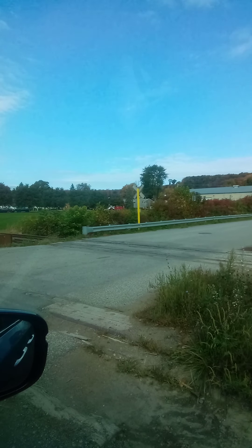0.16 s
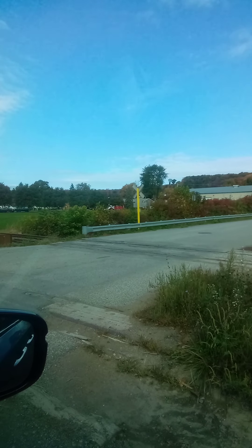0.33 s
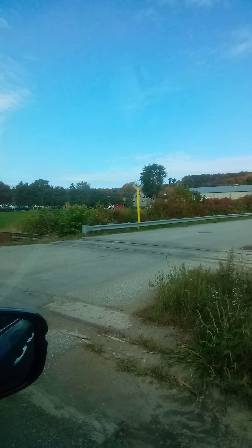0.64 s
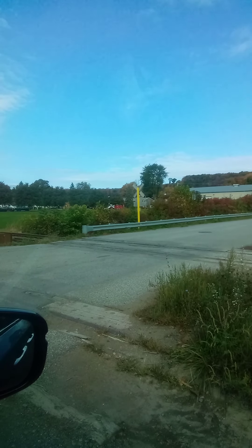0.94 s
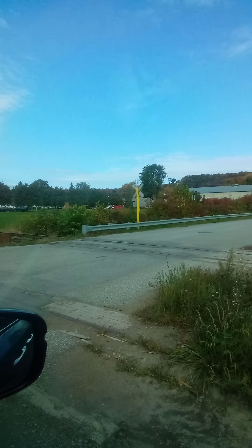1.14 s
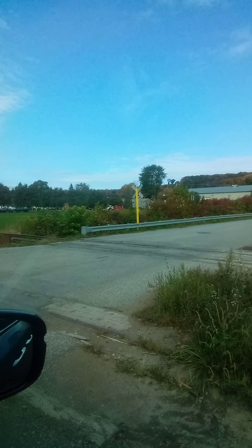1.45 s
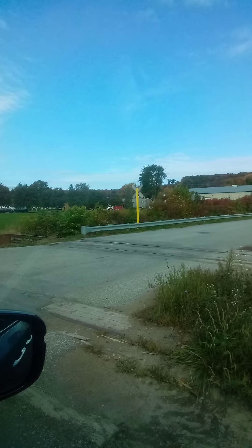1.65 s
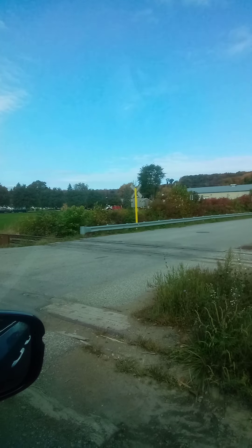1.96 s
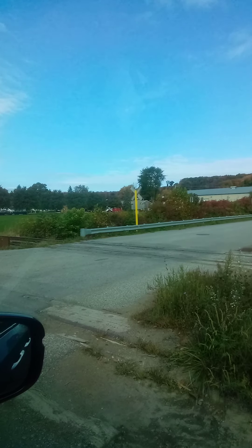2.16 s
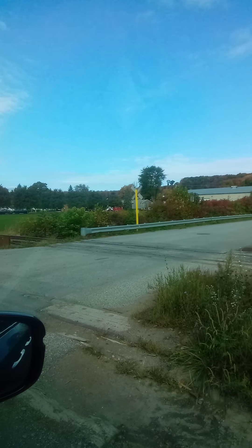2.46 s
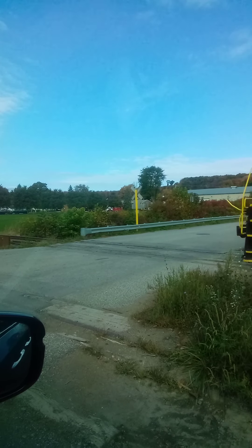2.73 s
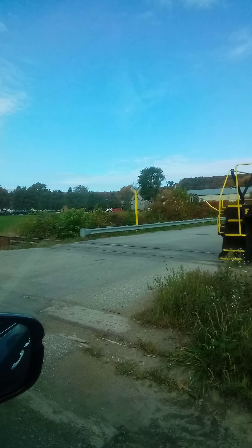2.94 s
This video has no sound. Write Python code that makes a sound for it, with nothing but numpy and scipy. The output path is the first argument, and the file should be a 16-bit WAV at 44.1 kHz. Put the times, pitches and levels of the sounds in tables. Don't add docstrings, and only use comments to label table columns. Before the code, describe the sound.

Locomotive horn blasts one long two-note chord over a low diesel rumble at a country crossing

```python
import sys
import numpy as np
from scipy import signal
from scipy.io import wavfile
from scipy.ndimage import uniform_filter1d

SR = 44100
rng = np.random.default_rng(int(sys.argv[2]) if len(sys.argv) > 2 else 0)


def makeup_ratio(level_db):
    decades = np.asarray(level_db, float) / 20
    return 10 ** decades


def store_pcm(level_fs):
    pcm = np.round(np.clip(level_fs, -1, 1) * 32767).astype(np.int16)
    wavfile.write(sys.argv[1], SR, np.atleast_2d(pcm).T)


N = 136710

START_S, STOP_S = .1965, 2.76
# t/s, level/dB
GLINT = [(.3, -3.5), (.6, -2), (.86, 1.5), (.91, 1.5), (1.25, 2), (1.55, -0.5), (1.75, 0.5), (2.1, -5),
         (2.6, -6.5)]
# t/s, pitch level/dB, brightness/(dB/octave)
HIGH_CHIME = [(.2, -76, 13), (.232, -35, 4), (.25, -22, -1.6), (.5, -22, 1.12), (.8, -20.5, -0.1),
              (1.45, -20, 0.46), (2.0, -17.5, -0.88), (2.58, -17.5, -1.52), (2.75, -21.5, -2.5)]


def curve(table, col=1):
    table = np.array(table, float)
    return np.interp(np.arange(N) / SR, table[:, 0], table[:, col])


def unit(x):
    return x / np.sqrt(np.mean(x ** 2))


def band(x, hz, width_hz):
    return signal.lfilter(*signal.iirpeak(hz, hz / width_hz, fs=SR), x)


def ringing_noise(hz, width_hz):
    return unit(band(band(rng.standard_normal(N), hz, width_hz), hz, width_hz))


def walk(rate_hz):
    hold = int(SR / rate_hz)
    steps = np.repeat(rng.standard_normal(N // hold + 1), hold)
    return 1.9 * uniform_filter1d(uniform_filter1d(steps, hold), hold)[:N]


def bands(table, flicker_db):
    table, out = np.array(table, float), 0
    octaves = np.log2(table[-1, 0] / table[0, 0])
    for hz in table[0, 0] * 2 ** np.arange(0, octaves, 1 / 3):
        db = np.interp(np.log(hz), np.log(table[:, 0]), table[:, 1]) + flicker_db * walk(9)
        noise = rng.standard_normal(N)
        out = out + makeup_ratio(db) * band(band(noise, hz, hz / 3), hz, hz / 3)
    return unit(out)


def blowing():
    t = np.arange(N) / SR
    tail_t60_s = 0.22
    opening = np.clip((t - START_S) / 0.0088, 0, 1)
    return opening * makeup_ratio(-60 * np.clip(t - STOP_S, 0, None) / tail_t60_s)


def ticks():
    # t/s, peak/dB
    blips = [(0.2827, -50), (0.304, -53), (0.6637, -50.5), (1.2053, -60), (1.224, -70), (1.403, -56.5),
             (1.6253, -61.5), (1.764, -58), (1.8221, -51), (2.1816, -53), (2.244, -51.5), (2.2765, -70.5),
             (2.3135, -51.5), (2.3819, -52), (2.4638, -55.5), (2.5045, -63.5)]
    hiss_db, tick_db, t60_s = -84, 2, .002
    out, u = makeup_ratio(hiss_db) * rng.standard_normal(N), np.arange(200) / SR
    for s, db in blips:
        i = int(s * SR)
        out[i:i + 200] += rng.standard_normal(200) * makeup_ratio(db + tick_db - 60 * u / t60_s)
    return signal.sosfilt(signal.butter(4, 8000, "high", fs=SR, output="sos"), out)


def clicks():
    # t/s, peak/dB, f/Hz, t60/s
    knocks = [(.107, -36, 3470, 0.0069), (0.107, -36, 3110, 0.025), (0.1078, -33, 3620, 0.04),
              (0.1078, -35, 1800, 0.016), (0.1075, -35, 2470, 0.021), (0.111, -37, 5400, 0.008),
              (0.114, -34, 3710, 0.0082), (2.243, -31, 6820, 0.0098), (2.2745, -24, 6700, 0.0079),
              (2.2766, -32, 4000, 0.007), (2.281, -32, 6630, 0.0086), (2.2913, -38.5, 6200, 0.011),
              (2.297, -29.5, 6760, 0.0077), (2.3122, -26, 3994, 0.011), (2.3133, -36, 6220, 0.0061),
              (2.3515, -21, 3900, 0.01), (2.3532, -32, 4010, 0.0088), (2.352, -29.5, 6300, 0.016),
              (2.359, -35.5, 6420, 0.0075), (2.3595, -40, 4000, 0.011), (2.37, -32.5, 6700, 0.013)]
    out, u = np.zeros(N + 1000), np.arange(1000) / SR
    attack = np.clip(u / .0009, 0, 1)
    for s, db, hz, t60_s in knocks:
        grit = unit(band(rng.standard_normal(1000), hz, hz / 7))
        tone = np.sin(2 * np.pi * hz * u) + .45 * grit
        i = int(s * SR)
        out[i:i + 1000] += tone * makeup_ratio(db - 60 * u / t60_s) * attack
    return out[:N]


def squeaks():
    # start t/s, length/s, f/Hz, level/dB
    slips = [
        (0, 0.061, 1937, -63),
        (0, 0.14, 3210, -67),
        (0, 0.074, 4740, -65.5),
        (.12, 0.097, 1957, -61),
        (0.15, 0.11, 4190, -62.5),
    ]
    t, out = np.arange(N) / SR, 0
    for s, length_s, hz, db in slips:
        shape = np.clip(np.minimum(t - s + .01, s + length_s - t) / 0.013, 0, 1)
        out = out + makeup_ratio(db) * shape * ringing_noise(hz, 49)
    return out


def late_bursts():
    # t/s, peak/dB, f/Hz, length/s
    thumps = [(2.745, -30, 190, 0.038), (2.785, -25, 150, 0.041), (2.824, -34, 338, 0.026),
              (2.866, -27.5, 125, .05), (2.885, -30.5, 267, .05), (2.925, -25.5, 159, 0.1),
              (2.955, -22.5, 152, 0.024), (2.996, -31, 326, 0.043), (3.005, -25.5, 214, 0.037),
              (3.023, -31, 111, 0.045), (3.04, -31, 315, .04), (3.075, -28, 134, 0.048),
              (3.085, -34, 255, 0.049)]
    t, out = np.arange(N) / SR, 0
    for s, db, hz, length_s in thumps:
        shape = np.exp(-(2 * (t - s) / length_s) ** 2)
        out = out + makeup_ratio(db) * shape * np.sin(2 * np.pi * hz * (t - s))
    return out


def diesel():
    # f/Hz, density/(dB/Hz)
    rumble = [(25, -27.5), (60, -19), (90, -4.5), (160, -7.5), (330, -17.5), (440, -23.5), (1100, -37.5),
              (6500, -64.5)]
    # t/s, level/dB
    engine_db = [(0, -36.5), (.2, -41), (1.5, -38), (2.6, -38.5), (2.8, -32), (3.1, -32)]
    # f/Hz, width/Hz, level/dB
    stack_modes = [(89.7, 9.8, -7.5), (108.1, 13, -1.5), (149.4, 6.7, -1), (214.3, 11, -5.5),
                   (265, 18, -12), (317, 7.3, -12.5)]
    # f/Hz, width/Hz, level/dB
    whine = [(1280, 300, -33), (1990, 560, -23.5), (3900, 1500, -28), (4900, 560, -33.5), (5930, 800, -28),
             (6700, 150, -34.5), (10600, 1400, -44)]
    # t/s, level/dB
    fans_db = [(0, -3.5), (.2, -1.5), (2.55, -10.5), (2.68, 5), (2.8, 7.5), (2.92, 3), (3.1, 0)]
    firing_hz, jitter, scatter_db, flicker_db = 26.1, 0.1184, 2.0, 2
    stack_db, stack_end_db = 1, -5
    duck_db, duck_s = -5, 0.096

    chance = rng.standard_normal((200, 2))
    at = (np.cumsum(1 + jitter * chance[:, 0]) / firing_hz * SR).astype(int)
    pulses = np.zeros(N)
    pulses[at[at < N]] = makeup_ratio(scatter_db * chance[at < N, 1])
    drive = unit(pulses) + 1.6 * rng.standard_normal(N)
    stack = unit(sum(makeup_ratio(db) * band(band(drive, hz, w), hz, 2 * w) for hz, w, db in stack_modes))

    fans = 0
    for hz, width_hz, db in whine:
        fans = fans + makeup_ratio(db + .9 * walk(22) + curve(fans_db)) * ringing_noise(hz, width_hz)

    i = np.arange(N)
    duck = uniform_filter1d(blowing() * (i < (STOP_S - duck_s) * SR), int(duck_s * SR))
    after_horn = (1 - duck) * (i > N / 2)
    stack = stack * makeup_ratio(stack_db + stack_end_db * after_horn)
    return (bands(rumble, flicker_db) + stack + fans) * makeup_ratio(curve(engine_db) + duck_db * duck)


def chime(hz, blat_db, thin_db, lead_s, sharp, sharp_end, shape, orders, beats):
    onset_s, onset_db_per_oct, fade_s, fade_db_per_oct = 0.268, -21.5, 2.663, -10
    echo_s, blat_s = 0.48, 0.1
    upper_beat = (0.52, 2.33, 0.5)
    waver_hz, breath_db, breath_width_hz = 0.11, -26.5, 59.6
    glint_hz, glint_width_hz = 4300, 900
    flutter_db, slow_db, slow_s = 2.8, -6.5, 0.3

    t = np.arange(N) / SR
    since = np.clip(t - START_S, 0, None)
    closing = np.clip((t - fade_s) / 0.13, 0, 1)
    slow, slow_settle_s, quick, quick_settle_s = sharp
    glide = slow * np.exp(-since / slow_settle_s) + quick * np.exp(-since / quick_settle_s)
    pitch_hz = hz * (1 + glide + sharp_end * closing)
    phase = 2 * np.pi * np.cumsum((pitch_hz + waver_hz * walk(11.73)) * (t > START_S)) / SR
    tilt = curve(shape, col=2) + fade_db_per_oct * closing
    tilt = tilt + onset_db_per_oct * np.clip((onset_s - lead_s - t) / 0.058, 0, 1)
    arrived = np.clip((t - onset_s) / echo_s, 0, 1)
    even_db = blat_db * np.exp(-np.clip(t - onset_s, 0, None) / blat_s)
    even_db = even_db + thin_db * np.clip((t - fade_s + 0.049) / 0.057, 0, 1)
    out = 0
    for k, db in orders:
        k = round(k)
        echoes = [b[1:] for b in beats if round(b[0]) == k] or [upper_beat] * (k > 1)
        wander_db = .2 if k < 9 else .45
        db = db + np.log2(k) * (tilt + wander_db * walk(5.1))
        db = db + even_db * (k % 2 == 0)
        db = db + curve(GLINT) * np.exp(-((k * hz - glint_hz) / glint_width_hz) ** 2)
        if k > 7:
            db = db + flutter_db * walk(16) + slow_db * np.exp(-since / slow_s)
        turn = k * phase + 2 * np.pi * rng.random() * (k > 1)
        echo = sum(d * np.sin(turn + 2 * np.pi * b * (t - at_s)) for b, at_s, d in echoes)
        out = out + makeup_ratio(db) * (np.sin(turn) - arrived * echo)
    breath = unit(band(rng.standard_normal(N), hz, breath_width_hz))
    return (np.sqrt(2) * out + makeup_ratio(breath_db) * breath) * makeup_ratio(curve(shape)) * blowing()


def horn():
    # t/s, level/dB, brightness/(dB/octave)
    low_shape = [(.2, -41, -14.5), (.235, -23.5, -0.5), (.38, -21.5, 1), (.74, -21.5, 1), (1.3, -24, 0.5),
                 (1.95, -20.5, 0), (2.6, -20.5, -0.5), (2.71, -23, 1.5), (2.78, -38.5, 3.5)]
    # multiple, level/dB
    low_orders = [(1, -1), (2, -8), (3, -12.5), (4, -32), (5, -30.5), (6, -38.5), (7, -36), (8, -37),
                  (9, -52.5), (10, -54), (11, -51.5), (12, -57.5), (13, -55.5), (14, -46.5), (15, -46),
                  (16, -56), (17, -47)]
    high_orders = [(1, 0.5), (2, -10.5), (3, -14.5), (4, -19.5), (5, -28.5), (6, -27.5), (7, -30),
                   (8, -31.5), (9, -38.5), (10, -42.5), (11, -42.5), (12, -45.5), (13, -40), (14, -45),
                   (15, -48), (16, -47), (17, -57.5), (18, -65.5), (19, -59), (20, -54.5), (21, -51),
                   (22, -52.5), (23, -47.5), (24, -50.5), (25, -58), (26, -52), (27, -54)]
    # multiple, beat/Hz, opposed at t/s, depth 0-1
    low_beats = [(2.0, 1.31, 1.09, 0.19), (2.0, 0.5, 2.48, 0.2), (3.0, 0.17, 2.2, 0.74),
                 (3.0, 0.82, 1.94, 0.2), (4.0, 0.68, 2.4, 0.47), (4.0, 2.13, 2.54, 0.4),
                 (5.0, 0.66, 1.1, 0.17), (5.0, 1.69, 1.44, 0.25)]
    high_beats = [(2.0, 0.69, 1.63, 0.3), (2.0, 0.24, 2.48, 0.24), (3.0, 0.19, 2.03, 0.69),
                  (3.0, -1.32, 2.39, 0.4), (4.0, 0.92, 2.41, 0.65), (4.0, -1.18, 0.86, 0.24),
                  (5.0, 0.71, 1.49, 0.31), (5.0, 2.9, 2.27, 0.18), (6.0, 0.16, 2.02, 0.62),
                  (6.0, -0.74, 1.0, 0.38), (7.0, 0.38, 2.6, 0.57), (7.0, -0.89, 0.74, 0.35),
                  (8.0, 0.59, 2.34, 0.49), (8.0, -2.78, 1.47, 0.24), (9.0, .45, 2.5, .65),
                  (10.0, .3, 2.75, .6), (10.0, .85, 1.2, .4), (11.0, .83, 2.0, .75), (13.0, .5, 2.0, .7)]
    # f/Hz, density/(dB/Hz)
    air_spectrum = [(700, 7), (1500, -8), (2200, 0), (3000, -15), (4300, -4.5), (6000, -9.5), (7200, -14)]
    # t/s, level/dB
    air_db = [(.15, -60), (.24, -49), (.45, -47), (.8, -48.5), (1.3, -50.5), (1.6, -51), (2.2, -54.5),
              (2.6, -56.5), (2.8, -61)]
    side_db, side_hz, patchy_db, gusts_db, pulsing = -22.5, 355.8, 1.6, 1.1, 0.62

    side = ringing_noise(side_hz, 5.2) * makeup_ratio(side_db + curve(HIGH_CHIME)) * blowing()
    low = chime(265.25, blat_db=0, thin_db=0, lead_s=0.014, sharp=(.019, .14, .06, .025), sharp_end=0,
                shape=low_shape, orders=low_orders, beats=low_beats)
    high = chime(320.7, blat_db=8, thin_db=-5, lead_s=0, sharp=(.013, .25, .036, .025), sharp_end=0.015,
                 shape=HIGH_CHIME, orders=high_orders, beats=high_beats)
    both = low + high
    air = bands(air_spectrum, patchy_db) * makeup_ratio(curve(air_db)) * (np.arange(N) > air_db[0][0] * SR)
    air = air * makeup_ratio(0.58 * curve(GLINT) + gusts_db * walk(30)) * (1 + pulsing * unit(both))
    return both + side + air


def scattered(blast):
    field_db, t60_s = -20, .8
    u = np.arange(SR // 2) / SR
    field = rng.standard_normal(len(u)) * makeup_ratio(-60 * u / t60_s) * (u > .03)
    return makeup_ratio(field_db) * signal.fftconvolve(blast, field / np.sqrt(np.sum(field ** 2)))[:N]


def late_echoes(blast):
    # delay/s, level/dB
    walls = [
        (.06, -25),
        (.125, -19),
        (.29, -26),
    ]
    late = sum(makeup_ratio(db) * np.roll(blast, int(s * SR)) for s, db in walls)
    late = signal.sosfilt(signal.butter(1, [500, 850], "band", fs=SR, output="sos"), late)
    return 2 * late * np.clip((np.arange(N) / SR - STOP_S + .04) / .06, 0, 1)


def scene():
    square_db, cube_db, cut_hz = -27, -22, 6140
    blast = horn()
    air = blast + scattered(blast) + late_echoes(blast)
    air = air + diesel() + clicks() + squeaks() + late_bursts()
    air = air + makeup_ratio(square_db) * air ** 2 - makeup_ratio(cube_db) * air ** 3
    air = signal.sosfilt(signal.butter(9, cut_hz, fs=SR, output="sos"), air)
    air = signal.sosfilt(signal.butter(1, 22, "high", fs=SR, output="sos"), air)
    return (air + ticks())[None]


def roll_off(x):
    return signal.sosfilt(signal.butter(12, 15830, fs=SR, output="sos"), x)


def record(dry):
    return roll_off(dry)


dry = scene()
out = record(dry)
store_pcm(out)
```